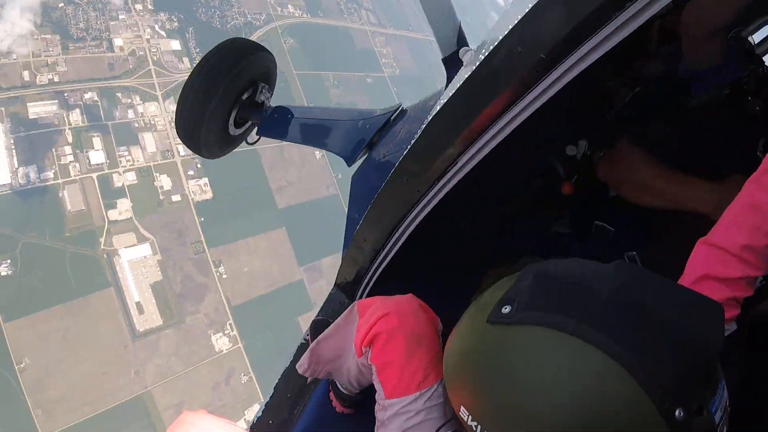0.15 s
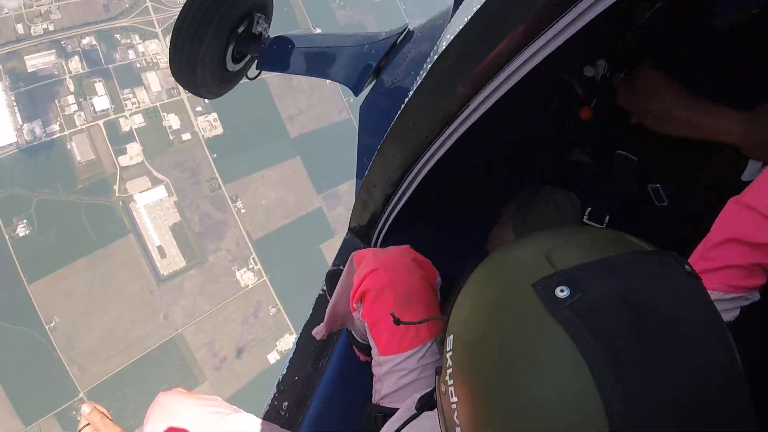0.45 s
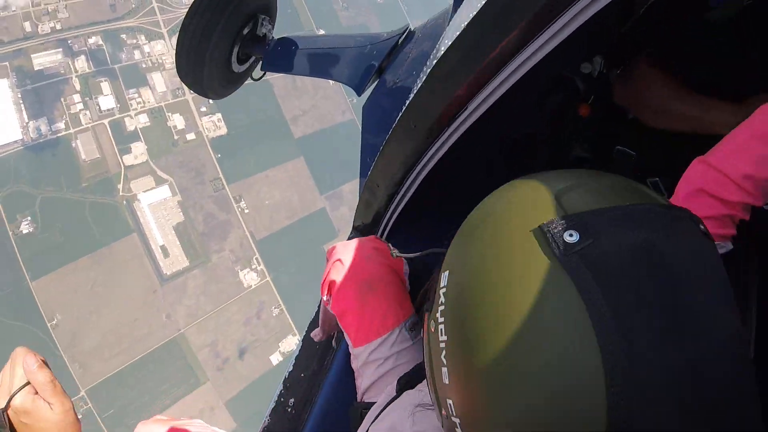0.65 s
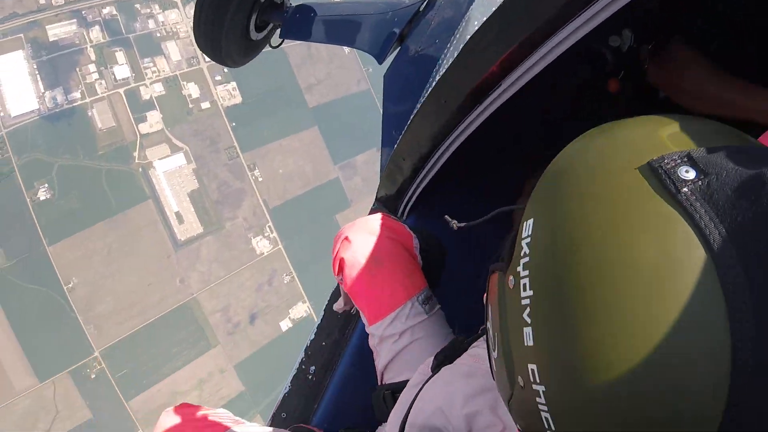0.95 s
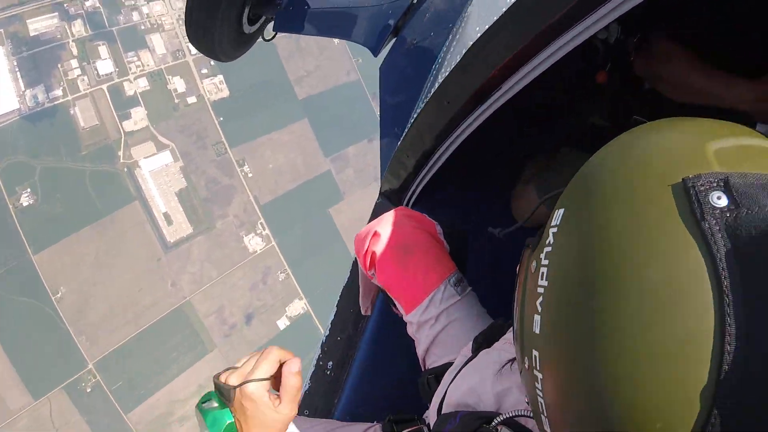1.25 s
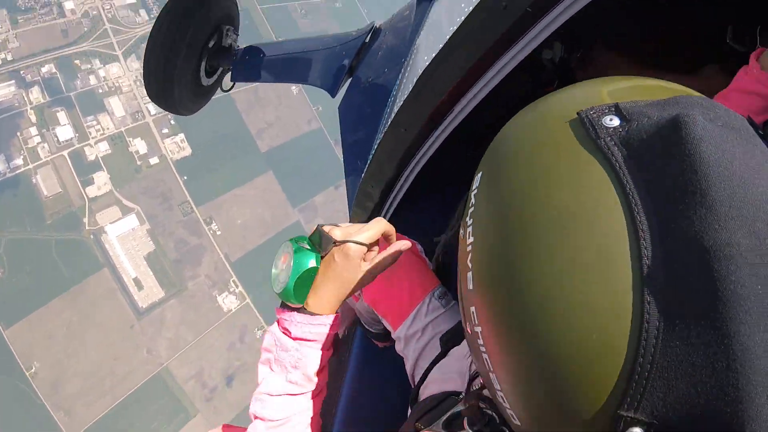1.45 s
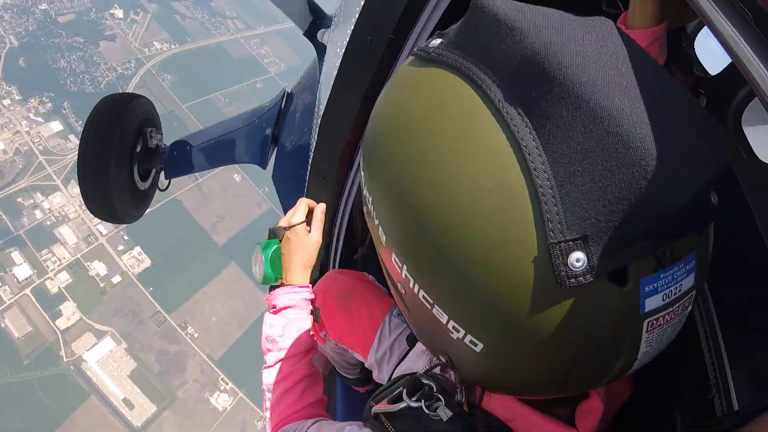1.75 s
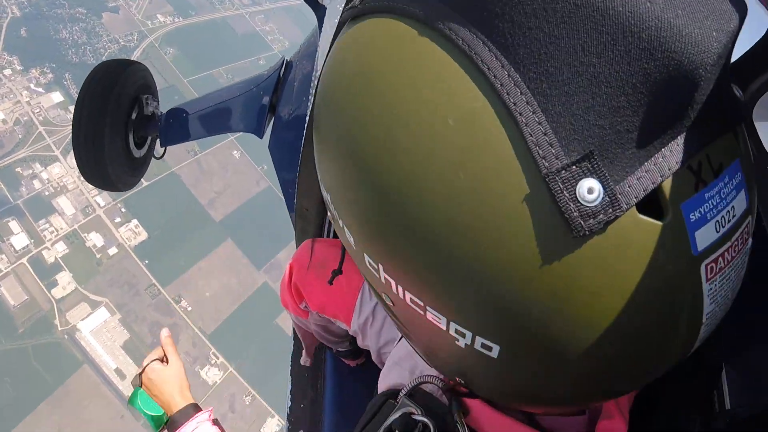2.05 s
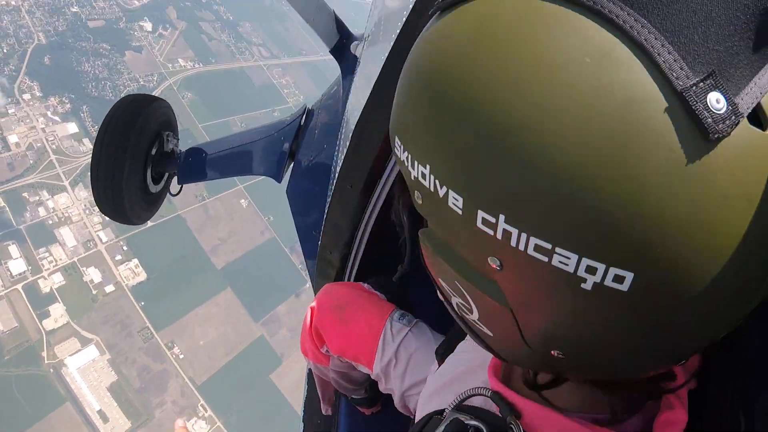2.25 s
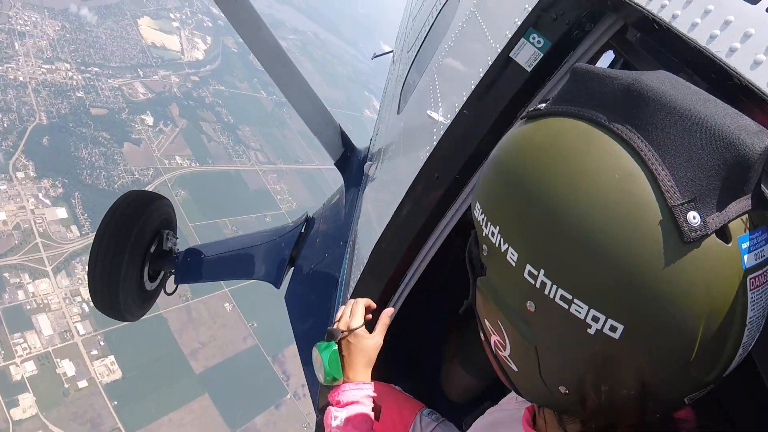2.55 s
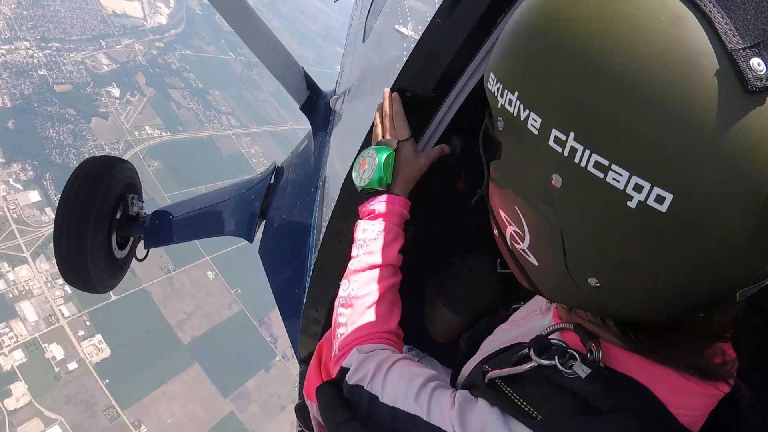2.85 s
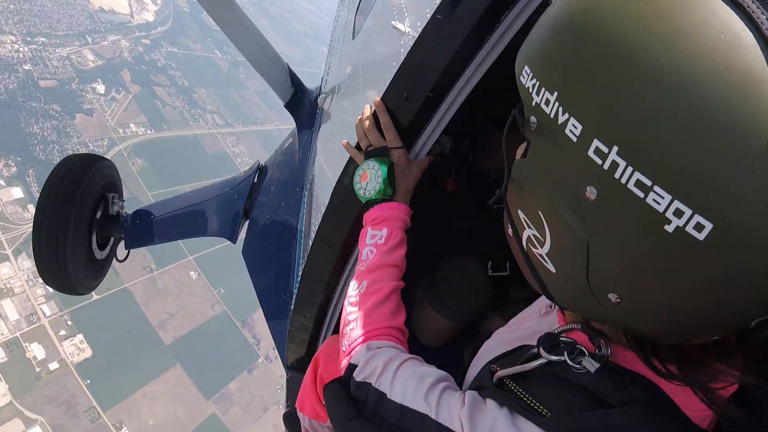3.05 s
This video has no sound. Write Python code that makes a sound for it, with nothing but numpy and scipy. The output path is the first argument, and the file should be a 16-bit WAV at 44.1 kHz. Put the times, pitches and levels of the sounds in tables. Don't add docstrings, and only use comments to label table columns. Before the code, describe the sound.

Wind noise at a small microphone by an open aircraft door. A short full gust sweeps off by 0.2 s, leaving airy roar over low rumble and a faint deep drone. Roar and hiss strengthen around 0.9-1.4 s. From 1.55 to 1.9 s heavy buffeting and crowded dull pops press the level into limiting; another thump hits near 2.3 s. Rumble then eases as rushing air returns until 3.2 s.

```python
import sys
import numpy as np
from scipy import signal
from scipy.io import wavfile
from scipy.ndimage import uniform_filter1d, minimum_filter1d

SR = 44100
rng = np.random.default_rng(int(sys.argv[2]) if len(sys.argv) > 2 else 0)


def decibels_to_gain(level_db):
    exponent = np.asarray(level_db, float) / 20
    return 10 ** exponent


def transcribe(u):
    v = np.clip(np.atleast_2d(u).T, -1, 1)
    q = np.round(v * 32767).astype(np.int16)
    wavfile.write(sys.argv[1], SR, q)


N = 140679

# start in seconds, level in dB, flutter share in dB, tilt in dB per octave.
HISS_COURSE = [(0, -49, 4, -2), (.17, -42.5, 2, .1), (.42, -46, -1, -1), (.74, -46.5, 1, 2),
               (.8, -40.5, -1, 3), (.91, -32, 1, -1.4), (1.04, -33.5, -1.5, -5), (1.2, -34.5, 2.5, -9.5),
               (1.4, -37.5, -6, -2.5), (1.6, -34, -14, 2.5), (1.68, -32.5, -12, 3), (1.73, -42, -5, 1.5),
               (2.0, -43, -5, 1), (2.3, -41, -7, 0.5), (2.55, -38, -12, 0), (2.75, -39, -13, -1.5),
               (3.05, -35.5, -18, 0), (3.19, -33, -9, -1)]
# frequency in Hz, density in dB per Hz.
HISS_SPECTRUM = [(3000, -26), (4000, 1.5), (4900, -.1), (6500, -2), (9000, -6.5), (10500, -18.5),
                 (12000, -23), (15000, -36)]
# start in seconds, level in dB, tilt in dB per octave.
RUSH_COURSE = [(0, -23, -4.5), (.13, -33.5, 4.5), (.2, -34, 2.5), (.36, -27.5, 1), (.52, -24.5, 0.6),
               (.72, -23, -1.5), (.79, -23, 2.5), (.93, -24.5, 0.5), (1.1, -20.5, 1.3), (1.345, -17.5, 0),
               (1.43, -26.5, -1.9), (1.67, -25, 2), (1.73, -28, -0.5), (1.96, -38.5, 6.5),
               (2.04, -31, -0.2), (2.68, -31.5, 0.6), (2.95, -25, 0.1), (3.19, -23, 0)]
# frequency in Hz, density in dB per Hz.
RUSH_SPECTRUM = [(200, 2.5), (400, 2.5), (800, -1.5), (1600, -6.24), (2500, -7), (3400, -11.5), (4200, -17),
                 (6000, -34)]
# start in seconds, level in dB.
SWELL_COURSE = [(0.0, -20), (0.21, -15), (0.23, -49), (0.26, -15.5), (0.32, -25.5), (0.73, -15.5),
                (1.76, -14.5), (1.79, -33), (1.86, -14), (2.29, -20), (2.49, -11), (2.9, -15),
                (2.96, -11.5), (3.19, -15.5)]
# frequency in Hz, density in dB per Hz.
SWELL_SPECTRUM = [(15, -38), (25, 2.5), (50, 0.5), (95, 4.2), (140, -9.5), (250, -16)]
# start in seconds, level in dB, upper edge in Hz.
GUST_COURSE = [
    (0, -24.5, 1000),
    (.03, -24.5, 1150),
    (.08, -21, 1140),
    (.105, -22, 730),
    (.14, -34, 620),
    (.2, -31, 503),
    (.23, -54, 350),
]
# time in seconds, peak in dB, limiter dip in dB (below 0: none).
POP_EVENTS = [(0.188, -24, -2), (0.258, -19, 0.5), (0.278, -20.5, -2), (0.497, -19.5, -1.5),
              (0.958, -17, -1.5), (1.508, -20, -1.5), (1.574, -14, -1.5), (1.615, -13, 0.5),
              (1.664, -12, -4), (1.681, -7, 6), (1.69, -8, -1), (1.702, -15, 3.5), (1.726, -9.5, 7),
              (1.745, -19, 4), (1.78, -19, 3.5), (1.81, -16, 3.0), (1.821, -17, 4.5), (1.842, -19, 1.5),
              (1.851, -16, -2), (1.903, -21, -10), (1.95, -22, 7.5), (2.041, -30, -4), (2.076, -26, 6.5),
              (2.222, -29, 3.5), (2.333, -23, 12)]
# start in seconds, level in dB, shedding pitch in Hz.
EDDY_COURSE = [(0.0, -18, 167), (0.03, -15, 169), (0.14, -15.5, 169), (0.18, -30.5, 140), (0.4, -23.5, 185),
               (0.83, -26.5, 135), (1.45, -19, 147), (1.58, -7, 174), (1.8, -4.5, 214), (1.84, -8.5, 212),
               (2.18, -11, 197), (2.26, -14, 170), (2.33, -3.5, 176), (2.42, -15.5, 149),
               (2.66, -13.5, 166), (2.74, -21, 144), (3.12, -17, 138), (3.19, -18.5, 142)]


def rms_one(x):
    return x / np.sqrt(np.mean(x ** 2) + 1e-20)


def in_time(rows):
    s, *columns = np.transpose(rows)
    return [np.interp(np.arange(N) / SR, s, column) for column in columns]


def at_hz(points, hz):
    point_hz, db = np.transpose(points)
    return np.interp(np.log(hz), np.log(point_hz), db)


def drift(rate):
    r = np.exp(-40 * np.pi * rate / SR)
    white = rng.standard_normal(N // 20 + 2002)
    slow = signal.lfilter([1], [1, -2 * r, r * r], white)[2000:]
    return np.interp(np.arange(N) / 20, np.arange(len(slow)), rms_one(slow))


def bands(low_hz, count, gain_db, shared_db, own_db, rate, order=2):
    white = rng.standard_normal((2, N + SR // 2))
    together = drift(rate)
    out, power = 0, 0
    for k in range(count):
        low = low_hz * 2 ** (k / 3)
        high = min(low * 2 ** (1 / 3), 0.48 * SR)
        sos = signal.butter(order, [low, high], "band", fs=SR, output="sos")
        band = signal.sosfilt(sos, white[k % 2])[-N:]
        gain = decibels_to_gain(gain_db(np.sqrt(low * high)))
        lumps = decibels_to_gain(shared_db * together + own_db * drift(rate / 2))
        out = out + gain * lumps * band
        power = power + gain ** 2 * 2 * (high - low) / SR
    return out / np.sqrt(power)


def resonate(x, hz, width_hz):
    r = np.exp(-np.pi * width_hz / SR)
    zeros = np.array([1, 0, -1]) * (1 - r * r) / 2
    return signal.lfilter(zeros, [1, -2 * r * np.cos(2 * np.pi * hz / SR), r * r], x)


def hiss():
    puffs_per_s, puff_spread_db, puff_s, apart_db = 550, 1.3, 0.00045, 5.5
    level_db, flutter_db, tilt = in_time(HISS_COURSE)
    strength = decibels_to_gain(puff_spread_db * np.minimum(rng.exponential(1, N), 4))
    born = (rng.random(N) < puffs_per_s / SR) * strength
    r = np.exp(-1 / (puff_s * SR))

    def colour(hz):
        return at_hz(HISS_SPECTRUM, hz) + tilt * np.log2(hz / 6500)
    air = bands(2540, count=8, gain_db=colour, shared_db=0.43, own_db=0.8, rate=24)
    low = signal.sosfilt(signal.butter(2, 7000, fs=SR, output="sos"), air)
    share = decibels_to_gain(flutter_db)
    out = 0
    for part in (low, air - low):
        own_born = born * decibels_to_gain(rng.normal(0, apart_db, N)) + 1e-18
        puffs = rms_one(signal.lfilter([1], [1, -2 * r, r * r], own_born))
        out = out + part * np.sqrt((1 + (share * puffs) ** 2) / (1 + share ** 2))
    return decibels_to_gain(level_db) * out


def rush():
    level_db, tilt = in_time(RUSH_COURSE)

    def colour(hz):
        return at_hz(RUSH_SPECTRUM, hz) + tilt * np.log2(hz / 1500)
    roar = bands(201.1, count=15, gain_db=colour, shared_db=0.58, own_db=0.8, rate=75)
    frame = decibels_to_gain(-7) * 2 * resonate(roar, hz=1600, width_hz=480)
    return decibels_to_gain(level_db) * rms_one(roar + frame)


def swell():
    drone_hz, drone_width_hz, drone_db = 94.1, 4.7, -16.5
    evening, even_s = 1, 0.022
    rumble = bands(16.03, count=13, gain_db=lambda hz: at_hz(SWELL_SPECTRUM, hz),
                   shared_db=-1.6, own_db=2.2, rate=6.4)
    drone = resonate(rng.standard_normal(N), drone_hz, drone_width_hz)
    drone = resonate(drone, drone_hz, drone_width_hz)
    x = rumble + decibels_to_gain(drone_db) * rms_one(drone)
    power = uniform_filter1d(x ** 2, size=int(even_s * SR))
    even = (power + 0.13) ** (-evening / 2)
    return decibels_to_gain(in_time(SWELL_COURSE)[0]) * rms_one(x * even)


def gust():
    level_db, edge_hz = in_time(GUST_COURSE)

    def colour(hz):
        octaves = np.log2(hz / edge_hz)
        return np.minimum(-7 * octaves, -30 * octaves)
    return decibels_to_gain(level_db) * bands(242, count=9, gain_db=colour, shared_db=3.7, own_db=3.0, rate=45)


def pops():
    low_hz, high_hz, boost_db, lag_s = 170, 754, 8, 0.001284
    small_per_s, small_db = 70, -12
    s, peak_db, _ = np.transpose(POP_EVENTS)
    small = decibels_to_gain(in_time(EDDY_COURSE)[0] + small_db)
    kicks = (rng.random(N) < small_per_s / SR) * rng.standard_normal(N) * small
    kicks[((s + lag_s) * SR).astype(int)] = decibels_to_gain(peak_db + boost_db) * rng.choice([-1, 1], len(s))
    spring = signal.butter(2, [low_hz, high_hz], "band", fs=SR, output="sos")
    dull = signal.butter(2, 1700, fs=SR, output="sos")
    port = np.vstack([spring, dull])
    port_peak = signal.sosfilt(port, np.arange(500) == 0).max()
    return signal.sosfilt(port, kicks + 1e-18) / port_peak


def eddies():
    below, top, above, tail = 4, 7.5, 34, 10.5
    edge_octaves, tail_db, peaking = 0.67, -23.5, 0.088
    level_db, pitch_hz = in_time(EDDY_COURSE)

    def colour(hz):
        octaves = np.log2(hz / pitch_hz)
        peak = np.minimum(below * octaves, -top * octaves)
        peak = peak - above * np.maximum(octaves - edge_octaves, 0)
        return np.maximum(peak, tail_db - tail * np.abs(octaves - 1))
    x = bands(63.46, count=14, gain_db=colour, shared_db=1.46, own_db=0.2, rate=62, order=4)
    return decibels_to_gain(level_db) * rms_one(x * (1 + peaking * np.abs(x)))


def limiter_dips():
    attack_s, release_s = 0.0043, 0.018
    gain_db = 0
    for s, _, dip_db in POP_EVENTS:
        after = np.maximum(np.arange(N) / SR - s - 0.003, 0)
        onset = 1 - np.exp(-(after / attack_s) ** 2)
        gain_db = gain_db - max(dip_db, 0) * np.exp(-after / release_s) * onset
    return decibels_to_gain(gain_db)


def limiter(x):
    limit, release_db_s, smooth_s = 0.95, 150, 0.0015
    size = int(smooth_s * SR)
    ramp = release_db_s * np.arange(N) / SR
    over_db = np.maximum(20 * np.log10(np.abs(x) / limit + 1e-9), 0)
    held_db = np.maximum.accumulate(over_db + ramp, axis=-1) - ramp
    early_db = minimum_filter1d(-held_db, size=size)
    return x * decibels_to_gain(uniform_filter1d(early_db, size=size))


def scene():
    pressure = hiss() + rush() + swell() + gust() + pops() + eddies()
    return (pressure * limiter_dips())[None]


def roll_off(x):
    return signal.sosfilt(signal.butter(12, 14890, fs=SR, output="sos"), x)


def record(dry):
    low_cut_hz, ceiling = 31, 1.3
    x = dry - 0.4 * resonate(dry, hz=4200, width_hz=800)
    low_cut = signal.butter(3, low_cut_hz, "high", fs=SR, output="sos")
    x = limiter(signal.sosfilt(low_cut, x))
    mix = x / (1 + np.abs(x / ceiling) ** 4) ** 0.14
    return roll_off(mix)


dry = scene()
out = record(dry)
transcribe(out)
```